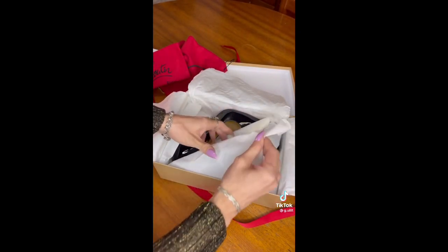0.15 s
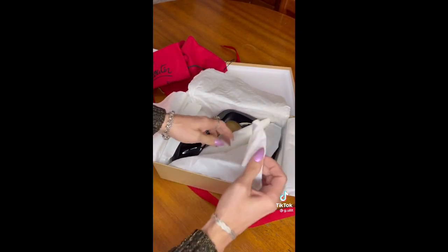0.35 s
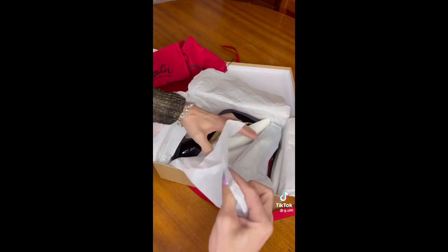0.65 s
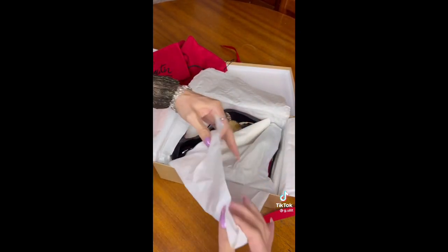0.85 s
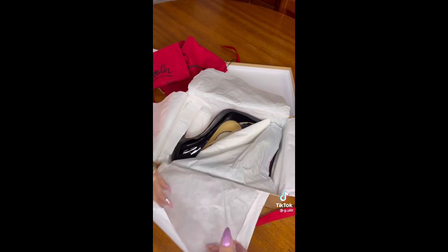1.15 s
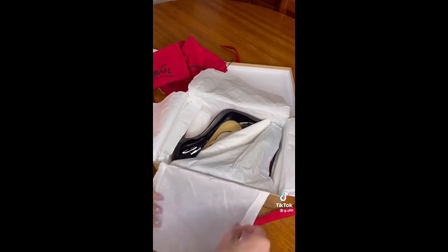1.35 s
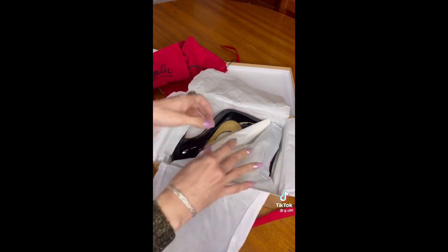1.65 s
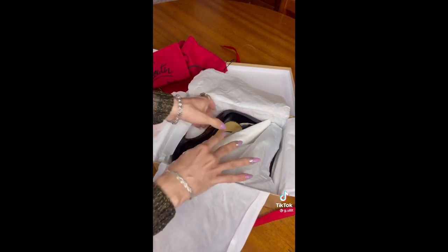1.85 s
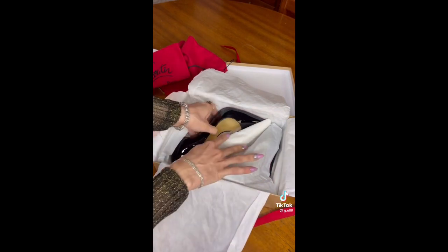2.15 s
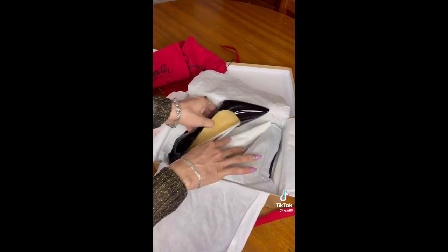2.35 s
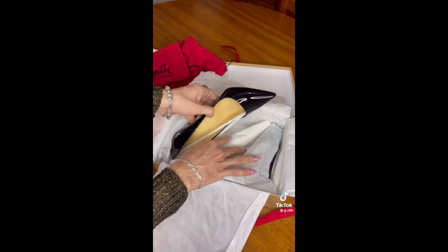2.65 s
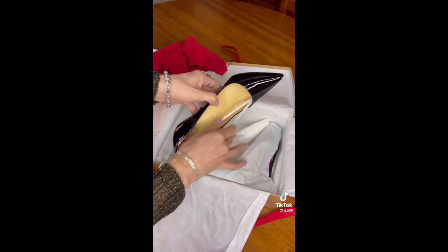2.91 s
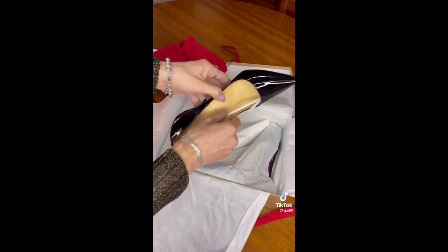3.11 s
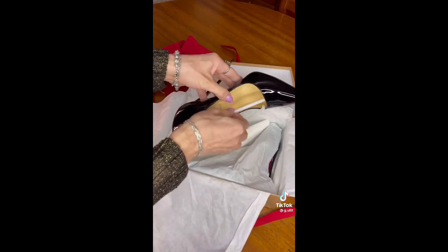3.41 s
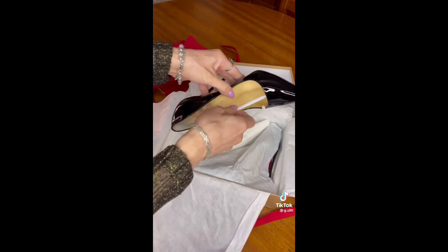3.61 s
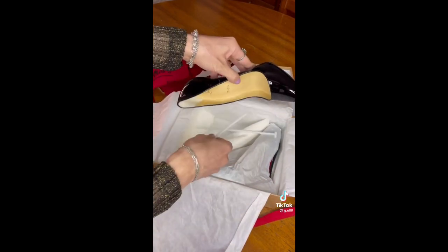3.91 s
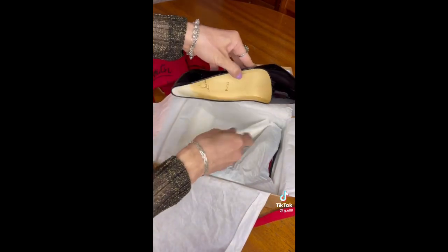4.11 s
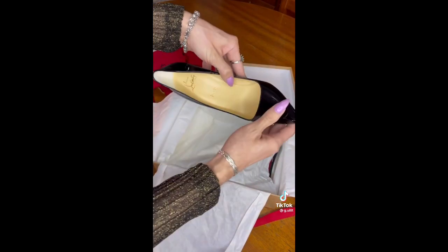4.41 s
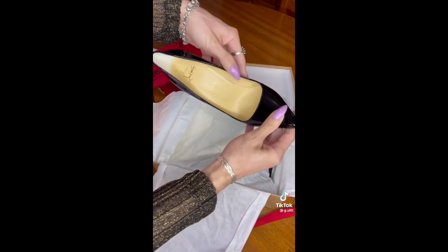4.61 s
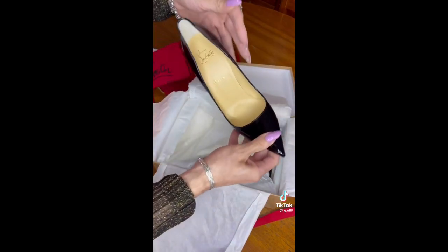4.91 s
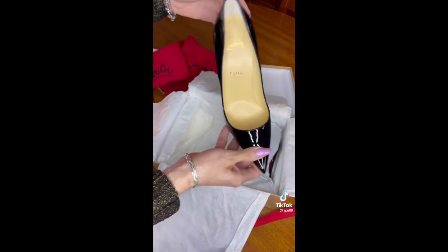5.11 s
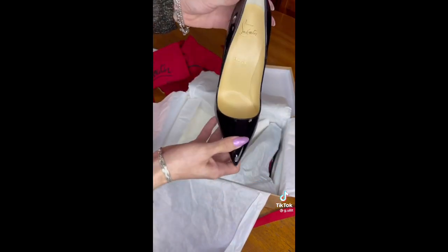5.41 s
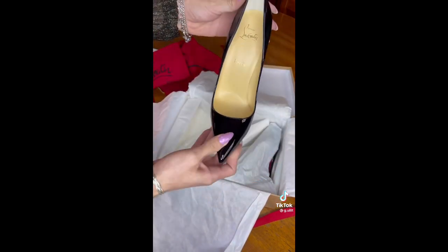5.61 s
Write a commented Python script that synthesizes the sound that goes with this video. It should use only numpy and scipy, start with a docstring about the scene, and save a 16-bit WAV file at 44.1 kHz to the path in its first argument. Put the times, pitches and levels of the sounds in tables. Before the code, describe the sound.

Close, crisp paper rustling with sharp snaps, a few box bumps and clicks midway, then a quiet room with only faint ticks.

```python
"""Tissue paper in a shoe box

Hands fold thin tissue paper back inside a cardboard box, lift a shoe out and turn it over, close under a phone.
The sheet crackles in countless tiny noise bursts and some loud snaps; the shoe rings the box's modes in knocks.
A quiet furnished room answers with decaying noise tails, air noise and a low appliance drone.
All of it is heard in stereo, with a spread that changes with frequency.
"""
import sys
import numpy as np
from scipy import signal
from scipy.fft import rfft, irfft, next_fast_len
from scipy.io import wavfile
from scipy.ndimage import uniform_filter1d

SR = 44100
rng = np.random.default_rng(int(sys.argv[2]) if len(sys.argv) > 2 else 0)


def store_wav(level_fs):
    """Save 16-bit WAV to argv[1]."""
    pcm = np.round(np.clip(np.atleast_2d(level_fs), -1, 1) * 32767)
    wavfile.write(sys.argv[1], SR, pcm.T.astype(np.int16))


def undo_db(level):
    """Turn decibels back into plain size, where 20 dB means ten times bigger."""
    steps = np.asarray(level, float) / 20
    return 10 ** steps


N = 254016
TIME = np.arange(N) / SR
SIZE = next_fast_len(N + SR)
HZ = np.arange(SIZE // 2 + 1) * SR / SIZE

# how hard the hands work the sheet; the last three are relative to the rustle:
# start_s, rustle_db, flaps_db, folds_db, treble_db
HANDLING = [(0, -39, -6.5, -8, 4), (.42, -38, -9.5, -10, 5), (.78, -40.5, -10, -9, 7.5),
            (1.02, -38.5, -17, -7, 6.5), (1.2, -47.5, -8.5, 1, 8.5), (1.32, -47, -17, -10, 5.5),
            (1.4, -60, -2, -20, 3), (1.75, -66, -6, -5, -10), (1.8, -54.5, -9.5, -9, -4),
            (1.95, -53.5, -8, -10, 1.5), (2.02, -46.5, -5, -7.5, 0.5), (2.45, -47.5, -10.5, -2.5, 1),
            (2.75, -44.5, -8, -10.5, 1), (2.96, -48, -10.5, -13.5, 1), (3.06, -69, -6, 12, 2.5),
            (3.3, -66, 13, -19, 5.5), (3.55, -72.5, 9, -3, -28), (3.7, -66, -4, 14, 3),
            (3.77, -45, -2.5, -1.5, 5), (3.87, -70.5, 2.5, -1.5, 11.5), (3.96, -53, 2, -11, 8.5),
            (4.0, -46, -11.5, -0.5, 4), (4.12, -52, -8.5, -17, 7.5), (4.2, -51, 3, -2.5, 2.5),
            (4.25, -62, -4.5, -3, 14), (4.35, -55, 2.5, 14.5, 1.5), (4.5, -73.5, 0, -5, -35),
            (4.65, -64.5, -3.5, -1.5, -2), (4.82, -77.5, -14.5, -6, -8), (5.3, -77.5, 10.5, 7.5, -26.5),
            (5.76, -85.5, 7.5, -4, -13)]
# brief tugs at the sheet, each a swell of the rustle: centre_s, swell_db, fade_s
TUGS = [(.01, 2.5, 0.015), (0.187, 1.5, 0.15), (0.265, 3.5, 0.018), (0.38, 1, 0.038), (0.539, 3.5, 0.048),
        (0.584, 1, 0.0204), (0.679, 4.5, 0.054), (0.842, 3.5, 0.012), (.9, 3.5, 0.02), (1.067, 3.5, 0.04),
        (1.139, 6.5, 0.035), (1.261, 6, 0.059), (2.15, 4.5, 0.015), (2.562, 1.5, 0.09), (2.706, 1, 0.089),
        (2.918, 4, .05), (3.985, 6, 0.012), (4.072, 4.5, .04), (4.151, 6, 0.0262)]
TUG_RISE = 0.74  # a tug swells in this share of the time it takes to fade
# loud single buckles; lows and treble are relative to the level, before each layer's trim:
# start_s, level_db, patch_pitch_hz, lows_db, treble_db
SNAPS = [(0.019, -22, 2780, -20, -18), (0.2546, -26, 2820, -23.5, 1), (0.3534, -25.5, 2790, -9, -1),
         (0.4566, -30, 2150, -18, 9), (0.5162, -26, 4400, -23, 3), (0.5728, -28.5, 2320, 1, -15),
         (0.6815, -23, 3530, -9, 6), (0.834, -27, 3920, -19, 2), (0.9016, -24, 1520, -24, 8),
         (1.057, -32, 3940, -9, 13), (1.1294, -32, 2520, 3, 0), (1.3366, -27.5, 3070, -27, 2),
         (1.3516, -39.5, 2420, -18, 23.5), (1.3655, -38, 3210, -17, 4), (1.4895, -36.5, 2520, -10.5, -9),
         (1.5126, -45, 2570, -5, 3), (1.5438, -44, 1530, 0, 2), (1.6018, -41.5, 4250, -2, 8),
         (1.6366, -41.5, 4670, -19, 5.5), (1.6864, -36, 1500, -25, -10), (1.72, -44, 4190, -11, 5),
         (1.7424, -47, 1600, -5, 5), (1.762, -45.5, 2990, -7, 13.5), (1.7809, -38, 3900, -15, 2),
         (1.9925, -33.5, 2630, -6.5, 4), (2.0314, -31.5, 2170, -6, 6.5), (2.166, -30, 2750, -23, -16.5),
         (2.1935, -36, 4290, -20, 12), (2.2084, -27.5, 2410, -18, -2), (2.2427, -30, 2810, -7, -2),
         (2.2765, -26, 3850, -11.5, 3), (2.3089, -31, 2530, -2, 11.5), (2.3456, -31.5, 1600, -7, -19),
         (2.361, -27, 1900, -11.5, -10), (2.4405, -26.5, 3000, -14, -17), (2.5443, -26.5, 1550, -10, -18),
         (2.5852, -30, 1670, -15, 0), (2.6742, -22, 2720, -23, -7), (2.7052, -27.5, 2040, -6.5, -19),
         (2.7467, -24, 2030, -8, -14), (2.838, -36, 1680, 0, -3), (2.8815, -36, 4190, -12, 1),
         (2.8892, -33, 3190, -14, 11), (2.9033, -35.5, 2210, -4, 13), (2.9863, -38.5, 2500, 0.5, 8),
         (3.1806, -39.5, 2320, -3.5, 2), (3.2803, -24, 1900, -2, -8), (3.453, -46, 1940, -2, -3),
         (3.495, -49, 1880, 7.5, -15), (3.5874, -42.5, 4150, -11, -14.5), (3.7118, -44.5, 2510, -16, 9),
         (3.7406, -35.5, 2540, -12, 7), (3.7539, -29.5, 4500, -19, 2), (3.8003, -35.5, 2470, -1, -2),
         (3.8937, -35.5, 2410, 0.5, 21), (3.897, -21.5, 3290, -3.5, -26), (3.9778, -29, 2650, -2, 15),
         (3.9914, -30.5, 2410, -0.5, -3), (4.0435, -23, 2010, -20, -0.5), (4.0504, -25, 2410, -16, 4),
         (4.1022, -27.5, 2080, -19, -2), (4.1398, -28.5, 2620, -16, -5), (4.1633, -32.5, 3700, -15, 1),
         (4.2579, -19.5, 2730, -8, -33), (4.4458, -42.5, 2110, -6, -8), (4.5705, -36.5, 1750, -19, -8.5),
         (4.604, -43, 2600, -12, -11), (4.643, -40.5, 2150, -19, 6.5), (4.667, -49.5, 3810, -12, 13.5),
         (5.0496, -36.5, 4330, -13, -17.5), (5.1936, -42, 2750, -8, -2.5), (5.201, -47, 2870, -9.5, -1),
         (5.2761, -44.5, 4680, -21, 0), (5.4014, -40, 3140, -32, -19), (5.4426, -35.5, 3630, -13, -2.5)]
# relative spectra of the sheet's parts, broad flaps to finest creases: frequency_hz, density_db_per_hz
FLAPS = [(50, -22), (110, -31.5), (200, -9), (350, 3), (560, 3.5), (800, -17.5)]
FOLDS = [(480, -17), (700, 2.5), (1000, 4), (1500, 0), (2200, -25)]
MIDDLE = [(1000, -6), (1600, 0.5), (2500, 2.5), (4600, 1.5), (6000, -16)]
SMALL = [(4200, -17.5), (5200, -2.5), (7000, -1.5), (8800, 2), (10200, -25)]
CREASES = [(8600, -19.5), (9800, 4), (11000, 9.5), (12400, 4), (13400, -4.5), (15000, -60.5)]
FINE_FADE = 0.086  # gentle handling loses the finest creases first: extra dB per dB of treble level

# reverberation of the furnished room: frequency_hz, t60_s
ROOM_DECAY = [(150, 1), (500, 1), (2000, 0.57), (6000, 0.22), (12000, 0.057)]
ROOM_GAIN_DB = -6
# relative spectrum of the air noise: frequency_hz, density_db_per_hz
AIR_SPECTRUM = [(20, -57.5), (36, -8), (52, 9), (95, -3.5), (160, -3), (300, -8.5), (530, -12.5),
                (750, -24.5), (2500, -33.5), (2950, -25), (3400, -26.5), (4100, -19.5), (5000, -32),
                (8000, -56.5), (11500, -71)]
AIR_DB = -60  # centre of its slow wander
# partials of the distant motor: pitch_hz, level_db, half_width_hz (either side, to half amplitude)
DRONE = [(64.5, -62.5, 7.3), (118, -65.5, 6.9), (186.4, -65.5, 4.4), (244, -70, 8.1), (2840, -80.5, 25.)]
# side level of the diffuse sound, thinner in some bands: frequency_hz, gain_db
DIFFUSE_SIDE = [(60, -22.5), (250, -21), (700, 0.5), (1300, -9), (1900, -22.5), (2800, -2), (5000, 3),
                (6300, -12.5), (7500, -13.5), (9500, 2), (11500, -9), (12600, -16.5)]

# the shoe against the cardboard: start_s, peak_db, contact_ms
KNOCKS = [(2.849, -29, 0.44), (2.92, -32, 0.39), (3.221, -39, 0.59), (3.282, -20.5, 0.97),
          (3.897, -39, 0.3), (3.98, -38, 0.31), (4.146, -37.5, 1), (4.196, -39, 0.875), (4.257, -22, 0.15),
          (4.311, -26, 0.18), (4.336, -26, 0.17), (4.348, -22, 0.15), (4.368, -29.5, 0.55)]
# modes of the box, about which each blow scatters: pitch_hz, relative_level_db, t60_s
BOX_MODES = [(101.3, -12, 0.18), (203, -10.5, 0.035), (268, -1.5, 0.036), (356, -1, 0.069),
             (432, -3, 0.038), (600, 0, 0.019), (718, -7.5, 0.038), (1020, 8, 0.016), (1250, 4, 0.016),
             (1550, -21, 0.0077), (2020, 12, 0.0093), (2545, 6, 0.019), (2700, 5, 0.015), (3490, 3, 0.0078)]
MODE_SCATTER_DB, PITCH_SCATTER = 2.5, .02  # standard deviations from blow to blow; pitch as a share

# stereo spread, as phase between left and right: frequency_hz, phase_rad
STEREO_SPREAD = [(60, .15), (700, .45), (1300, .3), (1600, .04), (2100, .04), (2500, .7), (3900, .9),
                 (5100, 2.5), (5650, 5.5), (5950, 6.25), (6750, 6.32), (7300, 7.4), (8300, 8.7),
                 (8800, 9.39), (10300, 9.46), (10700, 10.6), (11400, 11.1), (12200, 11.6), (12600, 12.55)]
# low cut of the microphone, and a thinned extreme treble: frequency_hz, gain_db
TONE = [(24, -16), (44, 0), (12800, 0), (13500, -10), (14400, -20), (15600, -23), (16400, -34)]


def along(table, hz=HZ):
    """Read (frequency, value) points on a log-frequency axis."""
    frequency, value = np.transpose(table)
    return np.interp(np.log(hz + 1), np.log(frequency), value)


def shape(x, response):
    """Filter by a frequency response."""
    return irfft(rfft(x, SIZE) * response, SIZE)[..., :N]


def unit(x):
    """Scale to rms 1."""
    return x / np.sqrt(np.mean(x ** 2))


def walk(rate):
    """Random levels held 1 / rate s and slewed twice; spread near 1."""
    hold = int(SR / rate)
    steps = np.repeat(rng.standard_normal(N // hold + 1), hold)
    slewed = uniform_filter1d(uniform_filter1d(steps, hold), hold)
    return 2.3 * slewed[:N]


def handling():
    """Levels in dB of the rustle, flaps, folds and treble; tugs swell them all, the treble most."""
    start_s, rustle_db, *others = np.transpose(HANDLING)
    swell = 0
    for centre_s, swell_db, fade_s in TUGS:
        width_s = fade_s * np.where(TIME < centre_s, TUG_RISE, 1)
        swell = swell + swell_db * np.exp(-((TIME - centre_s) / width_s) ** 2)
    rustle = np.interp(TIME, start_s, rustle_db)
    levels = [rustle + swell]
    for relative_db, share in zip(others, (.9, 1.1, 1.3)):
        levels.append(rustle + np.interp(TIME, start_s, relative_db) + share * swell)
    return levels


def buckles(rate, spread_db):
    """Kicks at random instants, rate per second, nearly equal in size."""
    sizes = undo_db(spread_db * np.minimum(rng.exponential(size=N), 3))
    return (rng.random(N) < rate / SR) * sizes


def bursts(kicks, ms):
    """Each kick opens a gust of noise that swells and dies within a few ms."""
    pole = np.exp(-1000 / (ms * SR))
    swell_and_fade = np.convolve([1, -pole], [1, -pole ** 3])
    return signal.lfilter([1], swell_and_fade, kicks) * rng.standard_normal(N)


def snaps(levels_db, ms, ring, hiss):
    """Gusts of the layer's hiss at the loud buckles, longer when louder; a share rings at the patch's pitch."""
    out, t = np.zeros(N + SR), TIME[:SR // 20]
    hiss = np.tile(hiss, 2)
    for (start_s, level_db, pitch_hz, *_), layer_db in zip(SNAPS, levels_db):
        fade_ms = ms * undo_db(0.16 * (level_db + 37.0))
        fade = (1 - np.exp(-t / 0.0006)) * np.exp(-t * 1000 / fade_ms)
        start = int(start_s * SR)
        noise = hiss[start:start + len(t)]
        patch = signal.lfilter(*signal.iirpeak(pitch_hz, 4.5, fs=SR), noise)
        gust = fade * ((1 - ring) * noise + ring * unit(patch))
        # the gust carries the energy of its envelope
        even = np.sqrt(np.sum(fade ** 2) / np.sum(gust ** 2))
        out[start:start + len(t)] += undo_db(layer_db) * gust * even
    return out[:N]


def tissue():
    """Dense buckling on the hands' motion, plus loud snaps; some buckles move all creases, others one size only."""
    middle, flaps, folds, treble = handling()
    _, snap_db, _, low_db, high_db = np.transpose(SNAPS)
    small = treble + 0.35 * (middle - treble) - .4
    creases = treble + FINE_FADE * (treble + 35) - .6
    # brisker handling packs the buckles closer
    pace = undo_db(0.45 * np.maximum(middle + 42, -9))
    shared, surge = buckles(300 * pace, 0.76), walk(24.97)
    # spectrum, bed_db, snap_db, burst_ms, own_buckles_db (against shared), snap_ms, ringing_share
    layers = (
        (FLAPS, flaps, snap_db + low_db - 22.5, 2.5, 4, 3.8, 0),
        (FOLDS, folds, snap_db + low_db, 1.5, 1.5, 3.2, 0),
        (MIDDLE, middle, snap_db, .9, -1, 1.6, .45),
        (SMALL, small, snap_db + 0.69 * high_db + 1.0, 1.3, -1, 1.7, 0),
        (CREASES, creases, snap_db + high_db, 1.3, -1, 1.7, 0))
    out = 0
    for spectrum, bed_db, layer_snap_db, ms, own_db, snap_ms, ring in layers:
        response = unit(undo_db(along(spectrum)))
        tinted = shared * undo_db(0.88 * rng.standard_normal(N))  # every buckle has its own colour
        common = unit(bursts(tinted / pace ** .5, ms))
        own = unit(bursts(buckles(1500, 0.43), ms))
        crackle = common + undo_db(own_db) * own
        bed = unit(crackle * undo_db(0.55 * surge + 0.33 * walk(30))) * undo_db(bed_db)
        hiss = shape(rng.standard_normal(N), response)
        out = out + shape(bed, response) + snaps(layer_snap_db, snap_ms, ring, hiss)
    return out


def room(x):
    """Decaying noise tails, shorter in the treble; the hands keep moving, so sound drifts between four paths."""
    t = TIME[:int(.8 * SR)]
    hz = np.fft.rfftfreq(len(t), 1 / SR)
    tails = 0
    for centre_hz in 125 * 2. ** np.arange(8):
        band = np.clip(1 - np.abs(np.log2((hz + 1) / centre_hz)), 0, 1)
        white = rng.standard_normal((4, 2, len(t)))  # four paths, each a common and a side part
        noise = irfft(rfft(white) * np.sqrt(band), len(t))
        onset = np.clip(t / 0.0012, 0, 1)
        fade = np.exp(-np.log(1000) * t / along(ROOM_DECAY, centre_hz)) * onset
        tails = tails + noise * fade / np.sqrt(np.sum(fade ** 2))
    share = np.array([undo_db(8 * walk(35)) for _ in tails])
    share = share / np.sqrt(np.sum(share ** 2, axis=0))
    answer = sum(shape(x * part, rfft(path, SIZE)) for part, path in zip(share, tails))
    return undo_db(ROOM_GAIN_DB) * answer


def quiet_room():
    """Soft air noise and the wavering partials of a distant motor, each a narrow band of noise."""
    air = unit(shape(rng.standard_normal((2, N)), undo_db(along(AIR_SPECTRUM))))
    air = air * undo_db(AIR_DB + 0.63 * walk(1.1))
    for pitch_hz, level_db, half_width_hz in DRONE:
        resonance = 1 / (1 + ((HZ - pitch_hz) / half_width_hz) ** 2)
        air[0] += unit(shape(rng.standard_normal(N), resonance)) * undo_db(level_db)
    return air


def diffuse(pair):
    """Diffuse stereo: one part common to left and right, a filtered side part added to one, taken from the other."""
    side = shape(pair[1], undo_db(along(DIFFUSE_SIDE)))
    return np.array([pair[0] + side, pair[0] - side])


def knocks():
    """A half-sine push and a short scuffle of small contacts ring the cardboard; each blow favours other modes."""
    out, t = np.zeros(N + SR), TIME[:SR // 5]
    pitch_hz, mode_db, t60_s = np.transpose(BOX_MODES)[:, :, None]
    sign = (-1.) ** np.arange(len(BOX_MODES))[:, None]  # neighbouring modes start against each other
    for start_s, peak_db, contact_ms in KNOCKS:
        level_shift, pitch_shift = rng.standard_normal((2, len(BOX_MODES), 1))
        level = sign * undo_db(mode_db + MODE_SCATTER_DB * level_shift)
        decay = np.exp(-np.log(1000) * t / t60_s)
        wave = np.sin(2 * np.pi * pitch_hz * (1 + PITCH_SCATTER * pitch_shift) * t)
        ring = (level * decay * wave).sum(axis=0)
        contacts = 0.022 * rng.standard_normal(SR // 10) * np.exp(-t[:SR // 10] / 0.031)
        contacts[0] = 1  # the main blow
        push = np.sin(np.pi * np.clip(TIME[:400] * 1000 / max(contact_ms, .06), 0, 1))
        blow = signal.fftconvolve(np.convolve(ring, push), contacts)
        start = int(start_s * SR)
        out[start:start + len(blow)] += blow / np.abs(blow).max() * undo_db(peak_db)
    return out[:N]


def scene():
    """Direct sound in the middle, the room and its noise around it."""
    near = tissue() + knocks()
    return near + diffuse(room(near) + quiet_room())


def top_cut(x):
    """Nothing passes above the cut-off."""
    return signal.sosfilt(signal.butter(12, 16300, fs=SR, output="sos"), x)


def record(dry):
    """Spreads the stereo by frequency, cuts the lows as the microphone does and thins the extreme treble."""
    turn = np.exp(.5j * along(STEREO_SPREAD))  # half the phase each way
    spread = np.array([turn, turn.conj()])
    mix = shape(dry, undo_db(along(TONE)) * spread)
    return top_cut(mix)


dry = scene()
out = record(dry)
store_wav(out)
```